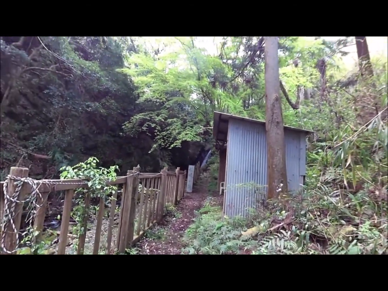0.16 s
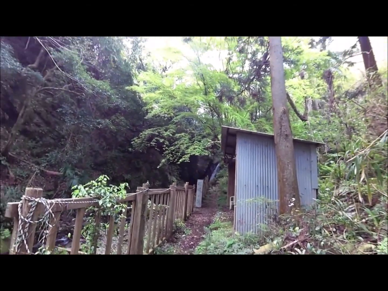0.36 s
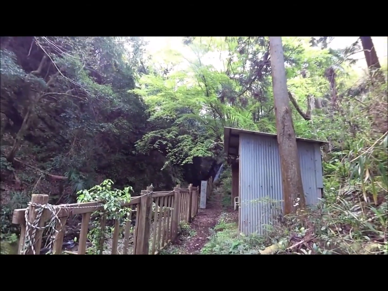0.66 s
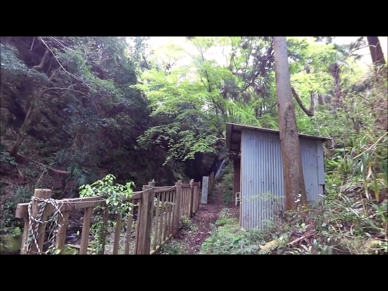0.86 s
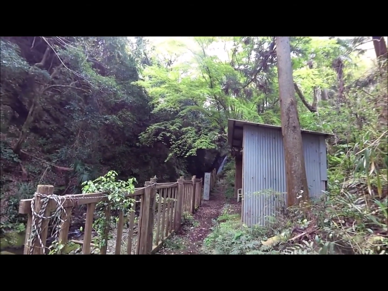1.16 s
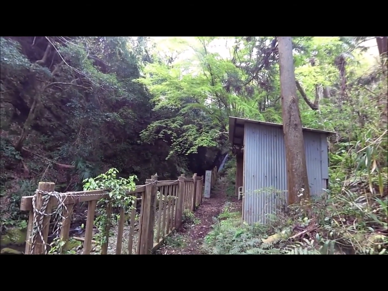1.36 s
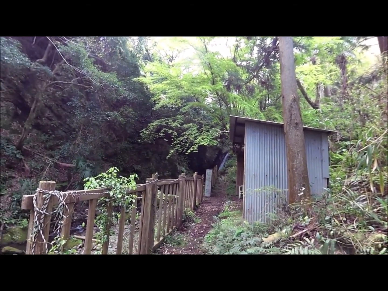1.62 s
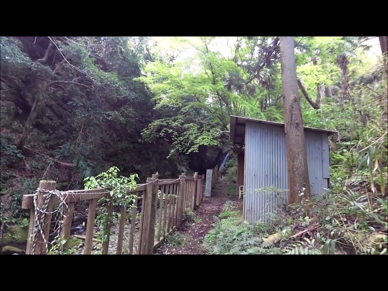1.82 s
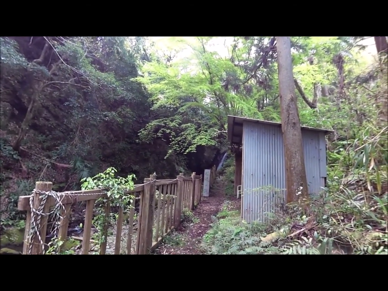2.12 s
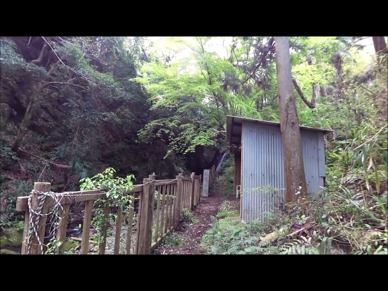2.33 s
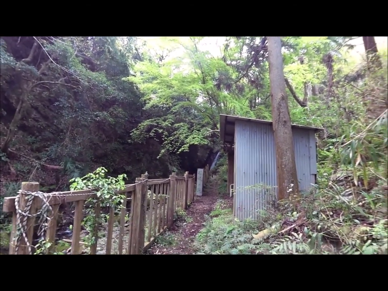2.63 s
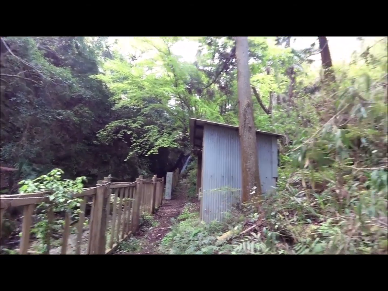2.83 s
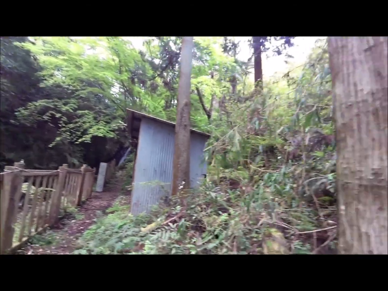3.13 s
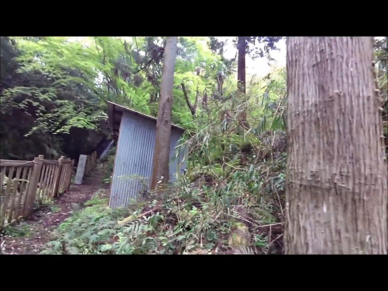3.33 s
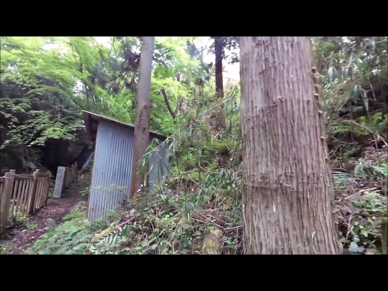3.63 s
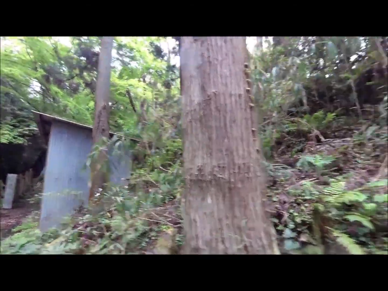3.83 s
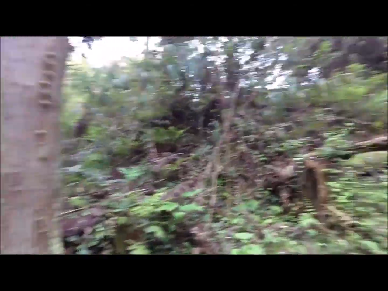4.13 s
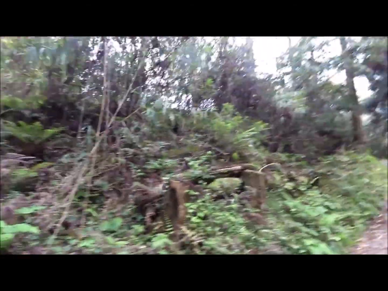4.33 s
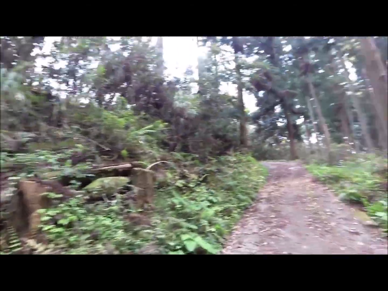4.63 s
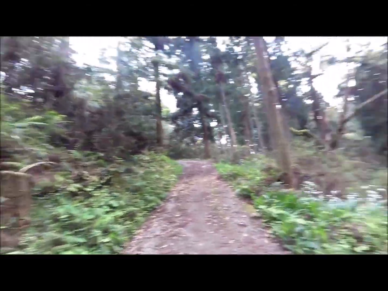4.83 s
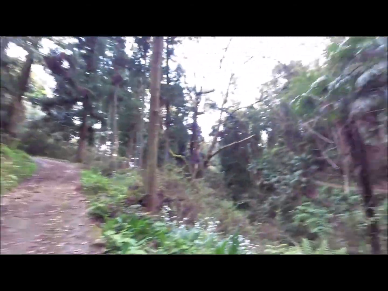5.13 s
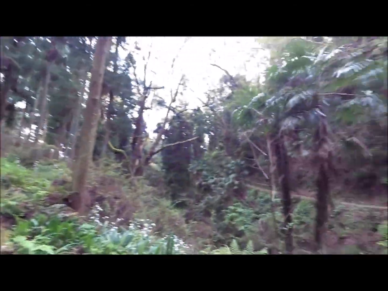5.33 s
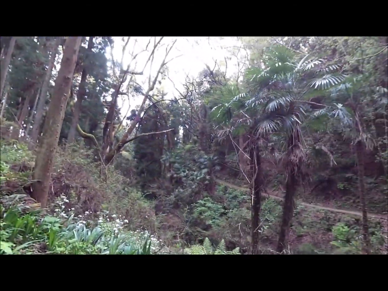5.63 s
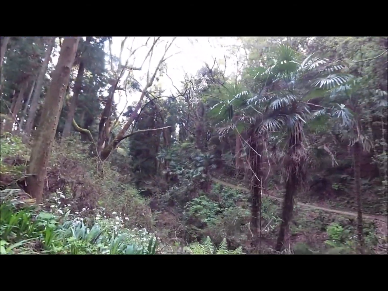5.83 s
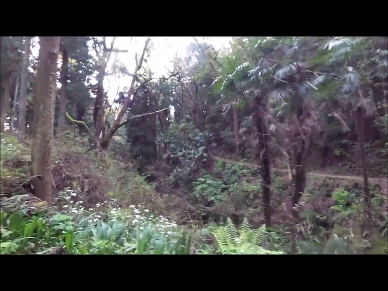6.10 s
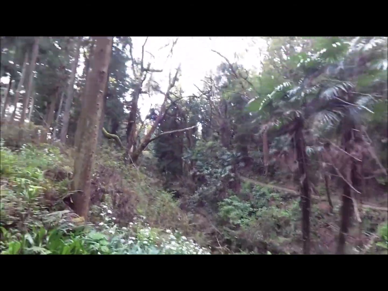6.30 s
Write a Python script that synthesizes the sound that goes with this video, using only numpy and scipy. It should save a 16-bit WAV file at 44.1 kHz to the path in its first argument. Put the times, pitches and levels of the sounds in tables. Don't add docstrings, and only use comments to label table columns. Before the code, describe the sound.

Steady broad rush of falling water with fine hiss above, broken around four seconds by loud dry cracks, faint leaf ticks and finger knocks.

```python
import sys
import numpy as np
from scipy import signal
from scipy.fft import rfft, irfft, next_fast_len
from scipy.io import wavfile
from scipy.ndimage import uniform_filter1d

SR = 44100
rng = np.random.default_rng(int(sys.argv[2]) if len(sys.argv) > 2 else 0)


def wav_out(sig):
    wavfile.write(sys.argv[1], SR, np.round(np.clip(np.atleast_2d(sig).T, -1, 1) * 32767).astype(np.int16))


def gain_from_db(level_db):
    decades = np.asarray(level_db, float) / 20
    return 10 ** decades


N = 284886


def unit(x):
    return x / np.sqrt(np.mean(x ** 2) + 1e-20)


def coloured(x, points):
    m = next_fast_len(N + 8192)
    hz, db = np.transpose(points)
    bins_hz = np.fft.rfftfreq(m, 1 / SR)
    gain_db = np.interp(np.log(bins_hz + 1), np.log(hz), db, -120, -120)
    return unit(irfft(rfft(x, m) * gain_from_db(gain_db), m)[:N])


def patchy(depth_db, bins, frames):
    z = signal.stft(rng.standard_normal(N + 512), nperseg=512)[2]
    field = uniform_filter1d(rng.standard_normal(z.shape), bins, 0)
    field = uniform_filter1d(field, frames, 1)
    return signal.istft(z * gain_from_db(depth_db * unit(field)), nperseg=512)[1][:N]


def ring(t, hz, t60_s, rise_s):
    decay = gain_from_db(-60 * t / t60_s)
    onset = (1 - np.exp(-t / rise_s)) ** 2
    return np.sin(2 * np.pi * hz * t) * decay * onset


def add(track, start_s, sound):
    track[round(start_s * SR):][:len(sound)] += sound


# time_s, heading_deg
HEADING = [
    (0, 8),
    (2.6, 0),
    (3.3, 34),
    (4.1, 49),
    (4.45, 77),
    (4.8, 92),
    (5.1, 127),
    (5.4, 150),
    (6.46, 185.5),
]
AWAY_DEG = 85
SHADOW_DEG, SHADOW_WIDTH_DEG, SHADOW_DB = 103, 34, -2.5
PORT_DEG, PORT_WIDTH_DEG = 41, 29


def camera_turn():
    heading = np.interp(np.arange(N) / SR, *np.transpose(HEADING))
    away = np.clip(heading / AWAY_DEG, 0, 1)
    shadow_db = SHADOW_DB * np.exp(-((heading - SHADOW_DEG) / SHADOW_WIDTH_DEG) ** 2)
    port = np.exp(-((heading - PORT_DEG) / PORT_WIDTH_DEG) ** 2)
    return away, shadow_db, port


# pitch_hz, level_db (per Hz)
HISS = [(3500, -32), (4800, 1.5), (5500, -2), (6300, -3), (8000, -9.5), (9500, -17.5), (11000, -26),
        (12300, -33), (12500, -57)]
HISS_DB, AWAY_HISS_DB, PORT_HISS_DB = -65, -1.5, 2.3


def stream_hiss(away, port):
    level_db = HISS_DB + AWAY_HISS_DB * away + PORT_HISS_DB * port
    return gain_from_db(level_db) * coloured(patchy(.6, 12, 7), HISS)


# pitch_hz, level_db (per Hz)
SPRAY = [(2500, -45.5), (3500, -17.5), (4000, -4.5), (4500, -2.5), (5000, -11.5), (5600, -16.5),
         (7000, -49)]
SPRAY_DB, AWAY_SPRAY_DB, PORT_SPRAY_DB = -63, 1.5, 3.5


def fall_spray(away, port):
    level_db = SPRAY_DB + AWAY_SPRAY_DB * away + PORT_SPRAY_DB * port
    return gain_from_db(level_db) * coloured(patchy(.9, 9, 7), SPRAY)


def bubbles(count=3000, size=640):
    when, pitch = rng.random(count), rng.standard_normal(count)
    loud = rng.exponential(size=count)
    hz = np.clip(950 * np.exp(.5 * pitch), 350, 2500)[:, None]
    cycles = hz * np.arange(size) / SR
    swell = cycles * np.exp(-cycles / 2.45)
    fade = np.hanning(2 * size)[size:]
    tone = np.sin(2 * np.pi * cycles * (1 + 0.01 * cycles)) * swell * fade
    tone = gain_from_db(2.36 * loud)[:, None] * tone
    at = (when * N).astype(int)[:, None] + np.arange(size)
    return unit(np.bincount(at.ravel(), tone.ravel(), N + size)[:N])


# pitch_hz, level_db (per Hz)
FACING = [(25, -26), (55, -18.5), (80, -14), (120, -3), (160, -6.5), (250, -5.5), (400, -8.5), (550, -1.5),
          (750, -0.5), (1200, -1.5), (2000, -4.5), (2600, -7), (3200, -16), (4200, -31)]
# pitch_hz, level_db (per Hz)
AWAY = [(25, -31), (55, -13), (80, -10), (120, -5.5), (160, -6), (250, -5), (400, -3), (550, -1.5),
        (750, -2), (1200, -3.5), (2000, -5.5), (2600, -6.5), (3200, -14.5), (4200, -24.5)]
RUSH_DB, AWAY_RUSH_DB, BUBBLES_DB = -35.5, -1.62, -13.5


def fall_rush(away, shadow_db):
    churn = patchy(0.76, 5, 9)
    rush = (1 - away) * coloured(churn, FACING) + away * coloured(churn, AWAY)
    level_db = RUSH_DB + AWAY_RUSH_DB * away + shadow_db
    return gain_from_db(level_db) * (rush + gain_from_db(BUBBLES_DB) * bubbles())


def water():
    away, shadow_db, port = camera_turn()
    treble = stream_hiss(away, port) + fall_spray(away, port)
    return fall_rush(away, shadow_db) + gain_from_db(0.83 * shadow_db) * treble


# start_s, level_db (peak), pitch_hz,
# first_swing (+1 or -1)
KNOCKS = [(0.1814, -16.5, 390, -1), (0.1864, -30, 260, -1), (.369, -39, 310, 1), (4.1677, -22, 310, 1),
          (4.398, -21.5, 597, 1), (4.6678, -19, 910, 1), (4.6688, -24, 790, 1), (4.6717, -28, 520, 1),
          (4.675, -24, 298, -1), (5.2951, -22, 450, -1), (5.302, -27, 440, 1), (5.9522, -20, 950, 1),
          (5.9588, -18.5, 560, -1), (5.9615, -21, 1450, 1)]
# start_s, level_db (peak), pitch_hz
GRIPS = [
    (3.152, -49, 55),
    (3.28, -48, 61),
    (4.03, -45, 61),
    (4.105, -37.5, 81),
    (4.2, -46, 60),
    (4.27, -48, 50.3),
    (4.919, -41, 79),
]
KNOCK_CYCLES, GRIP_CYCLES = 1.47, 9.7
SKIN_HZ = 2800


def fingers():
    track, t = np.zeros(N + SR), np.arange(SR // 4) / SR
    contacts = [(*row, KNOCK_CYCLES) for row in KNOCKS]
    contacts += [(*row, 1, GRIP_CYCLES) for row in GRIPS]
    for start_s, level_db, hz, swing, cycles in contacts:
        thin = signal.butter(2, 0.38 * hz, "high", fs=SR)
        push = signal.lfilter(*thin, ring(t, hz, cycles / hz, 0.12 / hz))
        add(track, start_s, np.sign(swing) * gain_from_db(level_db) * push / np.abs(push).max())
    return signal.lfilter(*signal.butter(2, SKIN_HZ, fs=SR), track[:N])


# start_s, level_db (peak), pitch_hz
TICKS = [(.173, -52, 7140), (3.9085, -49, 7200), (3.9085, -67, 10400), (3.955, -44, 6930),
         (3.956, -63, 10400), (4.2105, -44, 7150), (4.561, -58, 7460), (4.575, -40, 7200),
         (4.593, -58, 7960), (4.646, -46, 8400), (4.646, -37, 3020), (4.7445, -54, 7870),
         (4.7755, -52, 8040), (5.3225, -54, 8800), (5.3225, -51, 5620), (5.939, -55, 7060),
         (5.9475, -52, 7600)]
TICK_T60_S = .005
LEAF_TOP_HZ = 10800


def leaves():
    track, t = np.zeros(N + SR), np.arange(SR // 30) / SR
    grits = rng.standard_normal((len(TICKS), len(t)))
    for (start_s, level_db, hz), grit in zip(TICKS, grits):
        band = signal.butter(2, [.82 * hz, 1.18 * hz], "band", fs=SR)
        puff = signal.lfilter(*band, grit * gain_from_db(-60 * t / TICK_T60_S))
        add(track, start_s, gain_from_db(level_db) * puff / np.abs(puff).max())
    return signal.sosfilt(signal.butter(8, LEAF_TOP_HZ, fs=SR, output="sos"), track[:N])


# start_s, level_db (peak), low_modes_db, rise_ms
CRACKS = [(4.1676, -2, 3, 0.23), (4.3576, -17, -16, 0.13), (4.3674, -27, -3.5, .25),
          (4.384, -23, -21.5, 0.16), (4.3955, 0.1, -15.5, 2.1), (4.397, -7.5, -7, 0.14),
          (4.4001, -8.5, -8, 0.21), (4.401, -9, -6, 0.12), (4.40421, -8.5, -26, 0.11),
          (4.19, -40, -25, .16), (4.268, -29, -16, .16), (4.66, -23.5, 23, .3), (4.556, -34, -13, 0.21)]
# pitch_hz, level_db, t60_s
TWIG = [(1333, -10, 0.023), (1720, -5, 0.014), (2720, -5.5, 0.011), (3260, 11, 0.0053), (4100, -3, 0.011),
        (5370, -24, 0.0077), (7200, -38, 0.0041), (9320, -42, .004), (11900, -37, 0.0025),
        (15000, -57, .003)]
EVEN_RISE_MS, DULL_DB = 0.22, -8
GRIPPED = 0.58
SNAP_TOP_HZ, FAINT_DULLS = 16600, 0.32


def twigs():
    track, t = np.zeros(N + SR), np.arange(SR // 30) / SR
    scatters = rng.standard_normal((len(CRACKS), len(TWIG)))
    for (start_s, level_db, low_db, rise_ms), scatter in zip(CRACKS, scatters):
        high_db = DULL_DB * np.log2(abs(rise_ms) / EVEN_RISE_MS)
        wood = np.zeros(len(t))
        for (hz, mode_db, t60_s), vary in zip(TWIG, scatter):
            gain_db = mode_db + 1.5 * vary + low_db * (hz < 3000) + high_db * (hz > 4000)
            detuned_hz = hz * (1 + .02 * vary)
            wood += gain_from_db(gain_db) * ring(t, detuned_hz, t60_s * GRIPPED, abs(rise_ms) / 1000)
        top_hz = min(SNAP_TOP_HZ * gain_from_db(FAINT_DULLS * level_db), .45 * SR)
        wood = signal.sosfilt(signal.butter(4, top_hz, fs=SR, output="sos"), wood)
        add(track, start_s, gain_from_db(level_db) * wood / np.abs(wood).max())
    return track[:N]


def scene():
    return (water() + fingers() + leaves() + twigs())[None]


# centre_s, lost_above_hz, fade_length (in steps of STEP_S)
TREBLE_GAPS = [(.701, 4500, 0.5), (1.746, 4000, 0.5), (2.515, 4420, 0.48), (2.706, 4300, 0.47),
               (3.282, 5300, .55), (3.815, 4700, 0.5), (4.378, 9800, .6), (4.819, 5370, .55),
               (4.882, 4920, .55), (4.946, 5200, .55), (5.821, 5300, .55), (5.966, 4800, 0.73),
               (6.12, 5000, .55)]
STEP_S = 1024 / 48000
LOSS_DB, EDGE_HZ = -28, 110


def treble_dropouts(mix):
    hz, t, z = signal.stft(mix, SR, nperseg=128)
    for centre_s, top_hz, length in TREBLE_GAPS:
        distance = np.clip(np.abs(t - centre_s) / (length * STEP_S), 0, 1)
        kept = np.sin(np.pi / 2 * distance) ** 4
        above = 1 / (1 + np.exp(np.clip((top_hz - hz) / EDGE_HZ, -50, 50)))
        z = z * (1 - above[:, None] * (1 - gain_from_db(LOSS_DB)) * (1 - kept))
    return signal.istft(z, SR, nperseg=128)[1][:, :N]


def band_limit(x):
    return signal.sosfilt(signal.butter(12, 15800, fs=SR, output="sos"), x)


def record(dry):
    squash = 1.9
    rounded = dry / np.sqrt(1 + (dry / squash) ** 2)
    mix = treble_dropouts(rounded)
    return band_limit(mix)


dry = scene()
out = record(dry)
wav_out(out)
```